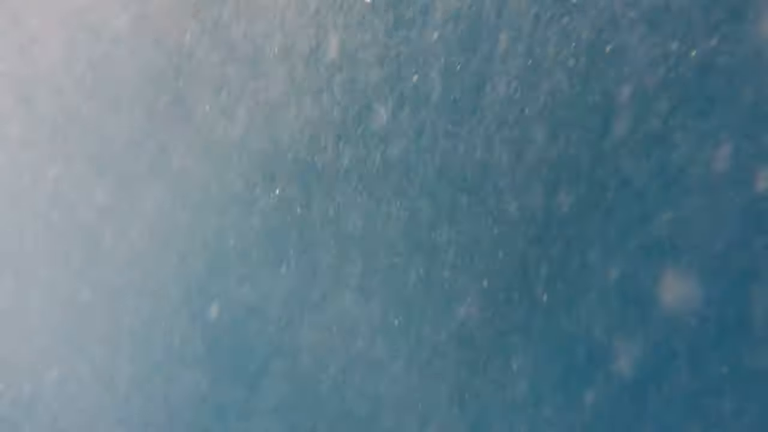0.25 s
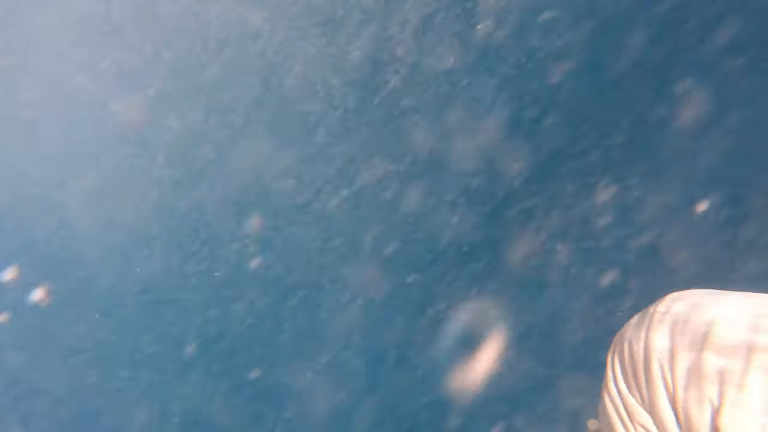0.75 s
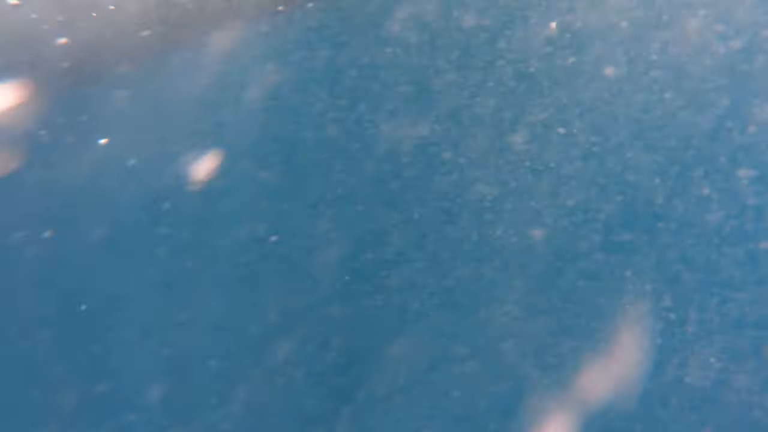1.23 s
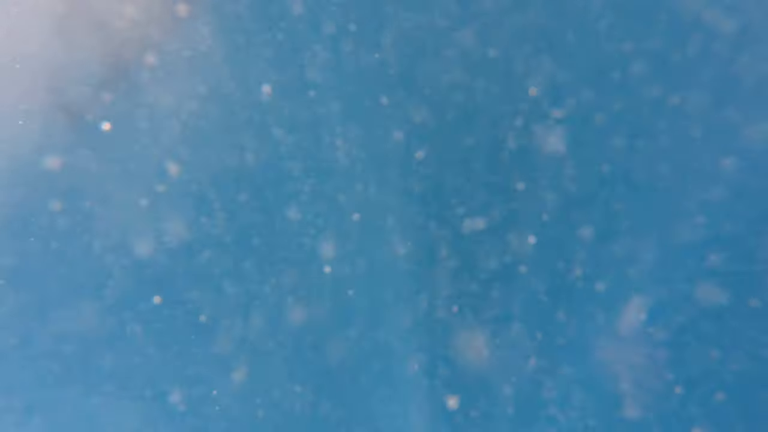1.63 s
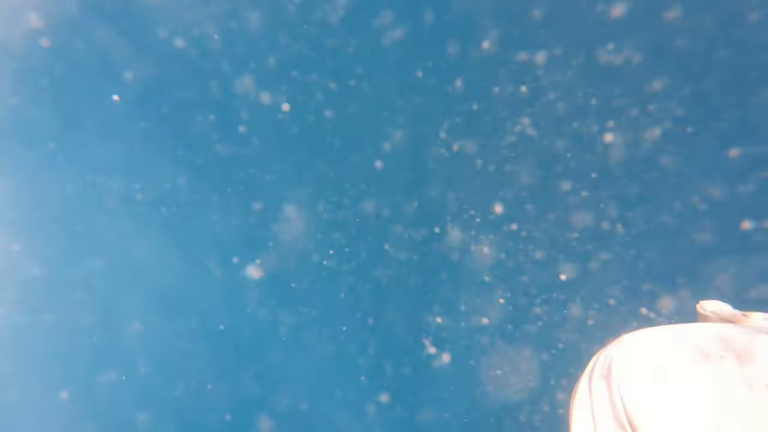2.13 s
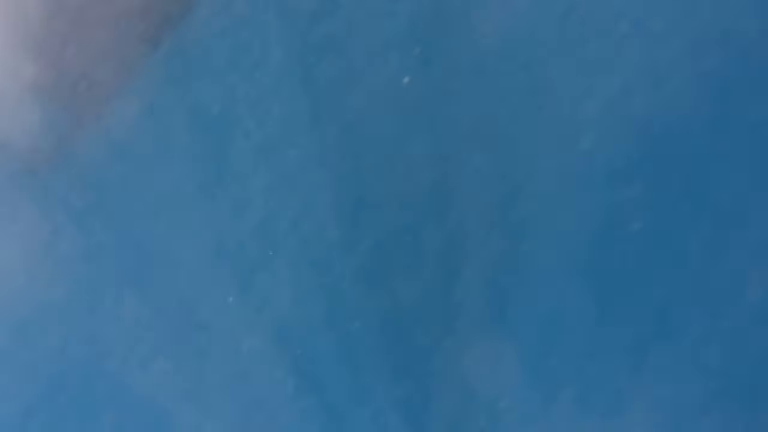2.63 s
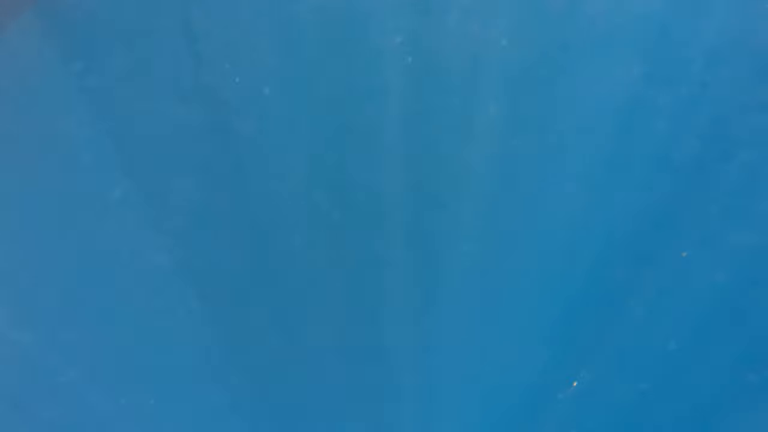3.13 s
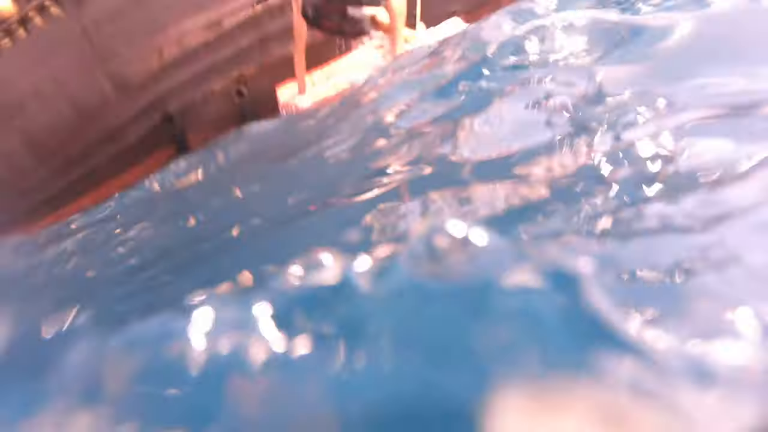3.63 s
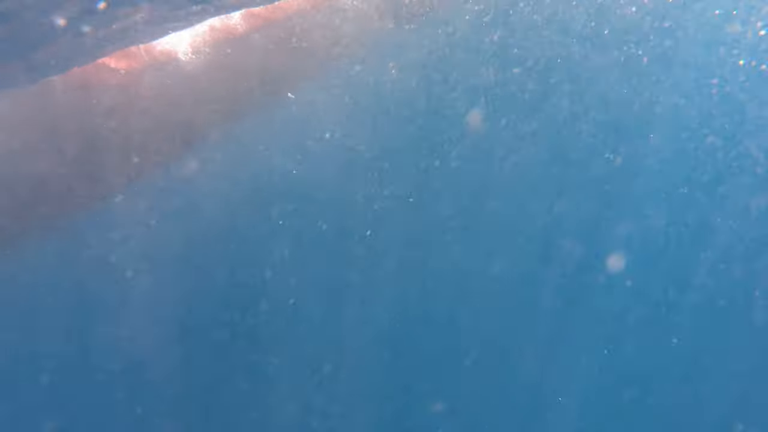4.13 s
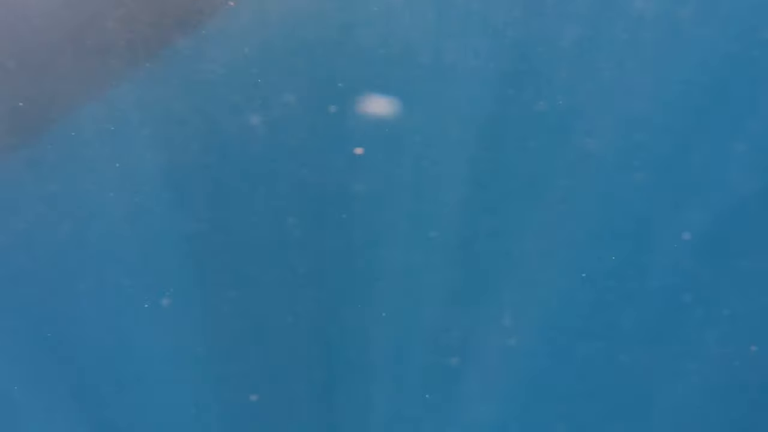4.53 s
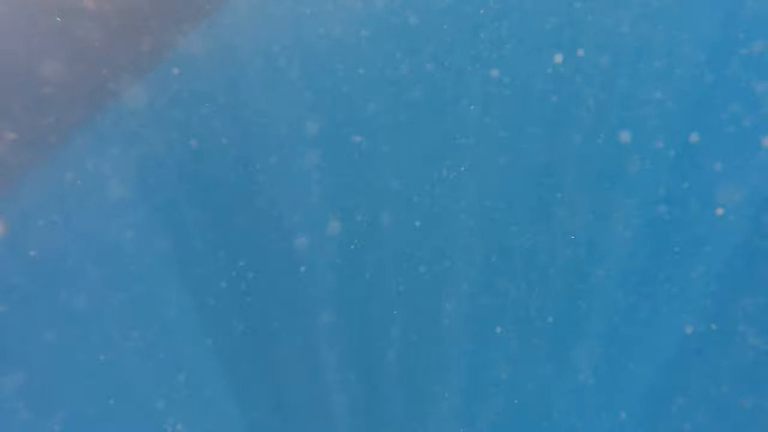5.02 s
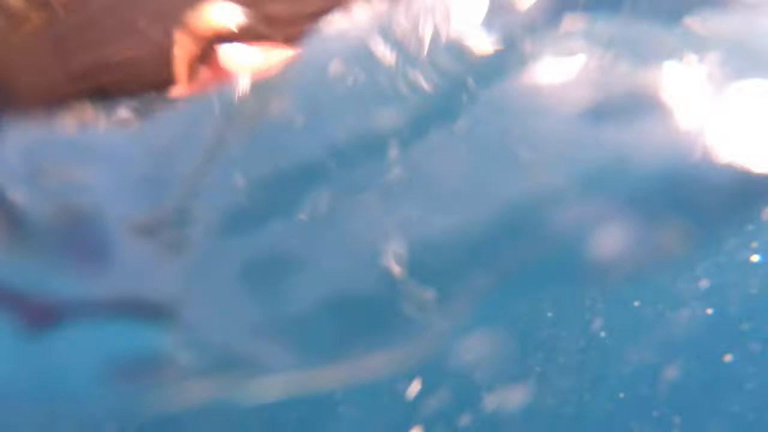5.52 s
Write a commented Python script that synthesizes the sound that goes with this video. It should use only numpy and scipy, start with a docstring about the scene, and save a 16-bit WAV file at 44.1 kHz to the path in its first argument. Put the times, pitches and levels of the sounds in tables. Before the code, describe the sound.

Heard from just below the surface of the sea, water churns gently around a microphone in a waterproof case. Close bubbles blip, click and crackle at uneven intervals, mixed with a few lower, wavering gurgles. Faint froth swells with each cluster and settles between them. Muffled bumps of water hit the case, the strongest near the middle and again about three quarters through.

```python
"""Air bubbles pinch off and ring for a few cycles near a sealed camera housing under the sea surface.
Tiny bubbles tick, air pockets gurgle as they change shape, and water shoves the case.
Behind them the water sloshes, froths and fizzes, swelling around the near bubbles.
The housing rings briefly; phase and level offsets between the channels give stereo width."""
import sys
import numpy as np
from scipy import signal
from scipy.fft import rfft, irfft, next_fast_len
from scipy.io import wavfile
from scipy.ndimage import uniform_filter1d, map_coordinates

SR = 44100
rng = np.random.default_rng(int(sys.argv[2]) if len(sys.argv) > 2 else 0)


def inscribe(sig):
    """Save sig as 16-bit PCM at rate SR to the path in sys.argv[1].

    A 1-D sig is mono; a 2-D sig holds one channel per row.
    Samples are clipped to [-1, 1] before scaling.
    """
    pcm = np.round(np.clip(np.atleast_2d(sig).T, -1, 1) * 32767)
    wavfile.write(sys.argv[1], SR, pcm.astype(np.int16))


N = 254456


def amp(db):
    """dB to gain."""
    return 10 ** (np.asarray(db) / 20)


def unit_rms(x):
    """x at rms 1."""
    return x / np.sqrt(np.mean(x ** 2) + 1e-20)


def curve_at(points, hz):
    """Interpolate (freq_hz, value) points on a log frequency axis."""
    freq_hz, values = np.transpose(points)
    return np.interp(np.log(hz + 1), np.log(freq_hz + 1), values)


def wobble(rate_hz):
    """Smooth random curve, rate_hz knots a second."""
    knots = rng.standard_normal(int(N * rate_hz / SR) + 4)
    return map_coordinates(knots, [np.arange(N) * rate_hz / SR])


def filtered(x, response):
    """Filter x by the gain response(hz)."""
    size = next_fast_len(N + SR // 4)
    return irfft(rfft(x, size) * response(np.fft.rfftfreq(size, 1 / SR)), size)[..., :N]


def noise(spectrum):
    """Stereo noise shaped by (freq_hz, density_db) points."""
    return filtered(rng.standard_normal((2, N)), lambda hz: amp(curve_at(spectrum, hz)))


# Stereo width, the left channel's phase lead over the right, by pitch: pitch_hz, lead_rad
STEREO_LEAD = [(330, -.4), (470, 2.5), (800, -2.5), (1200, -4), (1700, -5.5), (2600, -11.5), (3300, -5),
               (4000, -4), (5000, -3.5), (7000, -4), (8700, -1)]
def rings(start_s, db, hz, t60_s, pan_db, swell, glide, scatter, samples):
    """Damped stereo sines; swell is the rise time over t60, glide the relative pitch climb per t60."""
    t = np.arange(samples) / SR
    start_s, db, hz, t60_s, pan_db = (
        np.asarray(v, float)[:, None] for v in (start_s, db, hz, t60_s, pan_db))
    age = t / t60_s
    rise_s = swell * t60_s + 0.00006  # the case limits the fastest rise
    end_fade = np.minimum(1, 4 - 4 * t / t[-1])
    envelope = amp(-60 * age) * (1 - np.exp(-t / rise_s)) ** 2 * end_fade
    envelope *= amp(db) / envelope.max(axis=1, keepdims=True)
    phase = 2 * np.pi * hz * t * (1 + glide * age / 2)
    scatter_rad = scatter * np.clip(hz / 900, 0, 1) * rng.standard_normal(hz.shape)
    lead_rad = curve_at(STEREO_LEAD, hz) + scatter_rad
    index = (np.round(start_s * SR).astype(int) + np.arange(samples)).ravel()
    pair = [amp(side * pan_db / 2) * envelope * np.sin(phase + side * lead_rad / 2) for side in (1, -1)]
    return np.array([np.bincount(index, channel.ravel(), N + samples)[:N] for channel in pair])


# Hiss spectrum: freq_hz, density_db
HISS_SPECTRUM = [(2000, -30), (3300, 0), (6000, -7), (10500, -8)]
def hiss():
    """Bubbles too fine to tell apart."""
    return unit_rms(amp(5 * wobble(120)) * noise(HISS_SPECTRUM))


# Wash spectrum: freq_hz, density_db
WASH_SPECTRUM = [(200, -39.5), (450, -6), (900, 7.5), (1700, -11), (2600, 1), (3500, -17), (4500, -25),
                 (7000, -39), (16000, -100)]
def wash():
    """Muffled, patchy water noise."""
    return unit_rms(amp(3.5 * wobble(30)) * noise(WASH_SPECTRUM))


# Slosh spectrum: freq_hz, density_db
SLOSH_SPECTRUM = [(15, -24), (35, 0), (110, -3), (200, -8), (320, -13), (600, -37), (2500, -120)]
def slosh():
    """Low, lumpy water motion, nearly mono."""
    mid, side = noise(SLOSH_SPECTRUM)
    return unit_rms(amp(4.5 * wobble(25)) * (mid + 0.11 * np.array([side, -side])))


def swarm(count, centre_hz, spread, cycles, tail_db, samples):
    """Random bubbles in clumps: log-normal pitch, few loud and many faint."""
    pitch_z, life_z, pan_z = rng.standard_normal((count, 3)).T
    hz = np.clip(centre_hz * np.exp(spread * pitch_z), 480 + 60 * life_z, 14000)
    db = tail_db * np.minimum(rng.exponential(size=count), 2.7)
    db -= 2 * np.log2(hz / centre_hz)  # smaller bubbles are weaker
    cumulative_rate = np.cumsum(amp(7 * wobble(45)))
    start_s = np.searchsorted(cumulative_rate, rng.random(count) * cumulative_rate[-1]) / SR
    t60_s = cycles * np.exp(0.61 * life_z) / hz
    return unit_rms(rings(start_s, db, hz, t60_s, 4 * pan_z,
                          swell=0.068, glide=0.06, scatter=0.37, samples=samples))


# Churn around the case, before stirring: time_s, slosh_db, froth_db, sparkle_db
CHURN_LEVELS = [(0.0, -36, -32.5, -62), (0.3, -52, -42.5, -65), (0.46, -51.5, -51.5, -73),
                (0.72, -51, -50, -72.5), (1.27, -40, -37.5, -61.5), (1.4, -48.5, -38, -68),
                (1.53, -48, -51.5, -70.5), (2.54, -48.5, -45.5, -70), (2.79, -37.5, -35, -65),
                (3.18, -48.5, -43, -68.5), (3.47, -46.5, -49, -68.5), (3.74, -51, -49.5, -68),
                (3.92, -42, -42.5, -62), (4.39, -48.5, -49, -68), (4.74, -49, -42, -66.5),
                (5.26, -57, -45.5, -69), (5.58, -44.5, -41.5, -65), (5.77, -39.5, -41.5, -65)]
def water():
    """Churning water: slosh, a froth of small bubbles and a sparkle of finer ones."""
    time_s, *levels_db = np.transpose(CHURN_LEVELS)
    slosh_db, froth_db, sparkle_db = (np.interp(np.arange(N) / SR, time_s, db) for db in levels_db)
    low, muffled = slosh(), wash()
    small = swarm(count=3200, centre_hz=1257.3, spread=0.5868, cycles=25, tail_db=3, samples=800)
    crackle = swarm(count=1000, centre_hz=3220, spread=0.42, cycles=5.3, tail_db=3.5, samples=150)
    fizz = swarm(count=14000, centre_hz=5400, spread=0.33, cycles=8.3, tail_db=-0.5, samples=90)
    froth = amp(-8) * muffled + amp(0.3) * small
    sparkle = amp(3) * crackle + amp(-1) * fizz + amp(-8) * hiss()
    return amp(slosh_db) * low + amp(froth_db) * froth + amp(sparkle_db) * sparkle


def stirring(near, window_s=0.07, knee_db=-43, calm_db=-4, growth=0.34):
    """Gain of the water: near bubbles stir it up, and it calms between them."""
    window = round(window_s * SR)
    power = abs(uniform_filter1d(np.mean(near ** 2, axis=0), window, origin=window // 4))
    return amp(calm_db) * (1 + power / amp(knee_db) ** 2) ** (growth / 2)


# Housing decay: freq_hz, t60_s
HOUSING_DECAY = [(300, 0.033), (1700, 0.066), (4000, 0.021), (10000, 0.0029)]
def housing(x):
    """The case rings on after x, with a different tail in each channel."""
    hz, t, spectra = signal.stft(rng.standard_normal((2, SR // 8)), SR, nperseg=128)
    decay = amp(-60 * t / curve_at(HOUSING_DECAY, hz)[:, None])
    tail = signal.istft(spectra * decay, SR, nperseg=128)[1]
    tail /= np.linalg.norm(tail, axis=1, keepdims=True)
    return signal.fftconvolve(x, tail, axes=1)[:, :N]


# Water shoves: dip_s, level_db, swing_hz
WATER_SHOVES = [(0.106, -23, 202), (1.193, -24, 106), (1.361, -18, 44.2), (1.465, -11.5, 144),
                (1.528, -10.5, 102.7), (1.748, -21, 82.4), (1.798, -20.5, 74), (1.956, -24, 49.7),
                (2.043, -15.5, 192), (2.649, -13.5, 133), (2.705, -15.5, 58.4), (2.745, -12, 99),
                (2.844, -5, 158), (2.928, -21.5, 114), (3.364, -21.5, 71.6), (3.845, -16.5, 103),
                (4.026, -15, 90.5), (4.322, -18, 99), (4.346, -17.5, 122.4), (4.366, -3.5, 119),
                (4.463, -17, 94.5), (5.398, -24.5, 46.1), (5.558, -20.5, 57), (5.761, -13, 84)]
def shoves(t60_cycles=3.17):
    """Water pushes the case: a small rise, a rounded pressure dip, a slow swing back."""
    out, t = np.zeros(N + 4000), np.arange(-1000, 3000) / SR
    taper = np.hanning(4000) ** 0.5
    for dip_s, db, hz in WATER_SHOVES:
        cycles = hz * t + 0.25
        rise = -0.27 * 8 * cycles * np.exp(np.minimum(8 * cycles, 0))
        swing = -np.sin(2 * np.pi * cycles) * amp(-60 * cycles / t60_cycles)
        start = round(dip_s * SR) - 1000
        out[start:start + 4000] += amp(db) * np.where(cycles > 0, swing, rise) * taper
    return out[:N] * amp([[-0.3], [0.3]])


# Air pockets, one track each: time_s, pitch_hz, level_db
POCKET_TRACKS = [
    [(1.018, 555, -34), (1.026, 553, -29.5), (1.044, 549, -33), (1.055, 509, -56)],
    [(1.09, 620, -44), (1.096, 620, -39), (1.124, 630, -46), (1.132, 623, -48), (1.14, 573, -45)],
    [(1.143, 556.4, -28), (1.171, 554, -27.5), (1.183, 585, -41), (1.237, 657, -35), (1.29, 706, -56)],
    [(2.3, 540, -40), (2.306, 528, -35), (2.328, 532, -42.5), (2.35, 593, -46), (2.36, 578, -33)],
    [(2.647, 475, -19.5), (2.673, 478, -28.5), (2.691, 436, -32), (2.725, 430, -45), (2.74, 398, -31)],
    [(2.745, 406, -36), (2.801, 497, -17.5), (2.825, 494, -23.5), (2.875, 560, -35), (2.9, 755, -51)],
    [(2.95, 515.7, -54), (2.988, 443.4, -30), (3.024, 451, -40.5), (3.06, 620, -22.5), (3.09, 644, -31.5)],
    [(3.225, 554, -31), (3.235, 563, -37.5), (3.275, 544, -34.5), (3.325, 552, -30.5), (3.34, 586, -22)],
    [(4.36, 561, -14), (4.368, 595, -14.5), (4.38, 746, -29), (4.39, 700, -69)],
    [(4.885, 319, -63), (4.893, 316, -44.5), (4.899, 329.4, -41), (4.915, 453, -47), (4.925, 469, -61.5)],
]
def pockets(attack_s=0.00028, release_s=0.0025):
    """Air pockets ring on as they change shape; the flow shakes their pitch and level."""
    t, out = np.arange(N) / SR, np.zeros((2, N))
    waver, kicks_db = 1 + 0.04057 * wobble(90), 2.5 * wobble(60)
    for track in POCKET_TRACKS:
        time_s, hz, db = np.transpose(track)
        gate = np.clip(np.minimum((t - time_s[0]) / attack_s, (time_s[-1] - t) / release_s), 0, 1)
        envelope = np.sqrt(2) * gate * amp(np.interp(t, time_s, db) + kicks_db)
        phase = 2 * np.pi * np.cumsum(np.interp(t, time_s, hz) * waver) / SR
        lead_rad = curve_at(STEREO_LEAD, np.mean(hz)) + 0.15 * rng.standard_normal()
        out += envelope * np.sin(phase + np.array([[lead_rad], [-lead_rad]]) / 2)
    return out


# Ticks of the smallest bubbles: start_s, level_db, pitch_hz
BUBBLE_TICKS = [(0.047, -24.5, 9370), (0.0817, -23.5, 6900), (0.1033, -25.5, 5540), (0.159, -32.5, 5870),
                (0.185, -24, 8800), (0.2106, -34, 5700), (0.2438, -45, 5800), (0.256, -27, 9300),
                (0.2772, -24, 8240), (0.307, -42.5, 5600), (0.3861, -25.5, 6100), (0.4449, -40, 7060),
                (0.61, -44.5, 6850), (0.765, -27.5, 8580), (0.849, -42, 6580), (0.8597, -39.5, 5600),
                (0.9273, -35, 7650), (1.0897, -42, 5700), (1.1418, -22, 5600), (1.208, -24.5, 8900),
                (1.287, -35, 8990), (1.3303, -25, 6910), (1.3578, -14.5, 7380), (1.4318, -28, 5630),
                (1.4571, -46, 5430), (1.6454, -33, 5550), (1.747, -33.5, 8700), (1.7751, -11, 5550),
                (1.7894, -26, 7360), (1.809, -32.5, 9390), (1.8471, -22.5, 6530), (1.9036, -37, 6180),
                (2.0355, -33, 5650), (2.1598, -37, 6130), (2.4958, -44, 5350), (2.6137, -34, 5950),
                (2.6329, -40, 8960), (2.6484, -17, 6580), (2.6648, -26, 8160), (2.681, -23.5, 6110),
                (2.706, -21, 7700), (2.7404, -16, 5450), (2.7666, -45, 9360), (2.7862, -18, 10300),
                (2.7924, -36, 6360), (2.8138, -31.5, 7600), (2.9065, -24.5, 7600), (2.9616, -31.5, 9260),
                (2.9859, -36.5, 8450), (3.0056, -37, 6180), (3.0712, -26.5, 5760), (3.2817, -43.5, 6100),
                (3.3747, -42, 5880), (3.4216, -21, 9570), (3.7861, -27, 5500), (3.796, -15, 5780),
                (3.8487, -31, 5940), (3.8906, -44, 5800), (3.947, -32.5, 5500), (3.9923, -20, 9000),
                (4.0004, -22.5, 8900), (4.0109, -38, 6990), (4.048, -23.5, 9500), (4.0925, -27.5, 7360),
                (4.1985, -31, 5480), (4.3046, -28, 5540), (4.3209, -10.5, 10700), (4.3593, -32, 5470),
                (4.45, -42, 5330), (4.4902, -23.5, 5550), (4.6057, -31, 9660), (4.6743, -36, 5500),
                (4.684, -28.5, 9220), (4.7205, -22, 8250), (4.7457, -32, 8700), (4.784, -41, 8270),
                (4.809, -23, 10500), (4.8322, -15, 5170), (4.896, -26.5, 6700), (4.9825, -33.5, 6500),
                (5.162, -40.5, 5460), (5.3653, -25, 6700), (5.443, -22, 5830), (5.4744, -34, 8300),
                (5.495, -16, 5760), (5.518, -28, 7520), (5.627, -40, 5800), (5.6386, -32, 5600),
                (5.746, -28.5, 5460)]
def ticks():
    """Four tiny bubbles over one broad snap per tick, mostly louder on the right."""
    start_s, db, hz = np.repeat(np.transpose(BUBBLE_TICKS), 4, axis=1)
    pitch_z, time_z, level_z, pan_z = rng.standard_normal((len(hz), 4)).T
    pan_db = 4 * pan_z - 3
    tiny_hz = np.clip(hz * np.exp(0.29 * pitch_z), 4500, 15000)
    tiny_s = start_s - 0.0004 + 0.00052 * time_z
    tiny = rings(tiny_s, db - 7.5 + 2.1 * level_z, tiny_hz, 20 / tiny_hz, pan_db,
                 swell=0.07, glide=0, scatter=0.15, samples=400)
    snap = rings(start_s[::4], db[::4] - 4, hz[::4] / 2, 5 / hz[::4], pan_db[::4],
                 swell=0.052, glide=0, scatter=0.28, samples=100)
    return tiny + snap


def spray():
    """Fine fizz scattered for some milliseconds around each tick."""
    start_s, db, hz = np.repeat(np.transpose(BUBBLE_TICKS), 16, axis=1)
    pitch_z, time_z, level_z, pan_z = rng.standard_normal((len(hz), 4)).T
    fine_hz = np.clip(hz * np.exp(0.52 * pitch_z), 2500, 15000)
    fine_s = np.clip(start_s + 0.004 + 0.013 * time_z, 0, N / SR)
    fine_db = 0.65 * db - 37.5 + 5 * level_z  # a louder tick throws only somewhat more
    return rings(fine_s, fine_db, fine_hz, 10 / fine_hz, 4 * pan_z - 3,
                 swell=0.065, glide=0, scatter=0.45, samples=120)


def shed_bubbles(parent_s, parent_db, parent_hz):
    """Each pinch-off sheds three smaller bubbles within milliseconds."""
    start_s, db, hz = np.repeat([parent_s, parent_db, parent_hz], 3, axis=1)
    pitch_z, time_z, level_z, pan_z = rng.standard_normal((len(hz), 4)).T
    shed_hz = np.clip(hz * 1.412 * np.exp(0.439 * pitch_z), hz, 9000)
    shed_s = start_s + 0.0029 * abs(time_z)
    return rings(shed_s, db - 14 + 4 * level_z, shed_hz, 14.29 / shed_hz, 4 * pan_z,
                 swell=0.089, glide=0.041, scatter=0.37, samples=500)


# Near bubbles: start_s, level_db, pitch_hz, t60_cycles, pan_left_db
NEAR_BUBBLES = [(0.0472, -17.5, 3070, 4.5, -5), (0.0781, -26, 847, 73, 3.5), (0.082, -24, 1710, 30, -0.5),
                (0.1566, -13, 2048, 22, -5.5), (0.2006, -15, 1466, 27, 3), (0.2087, -18, 990, 19, 8),
                (0.2117, -18, 1570, 29.5, -1), (0.245, -15, 3270, 16, 5), (0.2504, -14, 1690, 13, 3),
                (0.2785, -15, 1680, 43, -2.5), (0.2792, -20.5, 1100, 42, -3), (0.318, -24.5, 1790, 53, 14),
                (0.3353, -12, 1759, 32, 4), (0.381, -19.5, 1620, 81.5, 4), (0.432, -33.5, 315, 33.5, 2),
                (0.4453, -14, 1580, 11.5, 16), (0.461, -21.5, 1668, 45, -1), (0.4836, -29, 1710, 31.5, 18),
                (0.7665, -8.5, 1818, 11.5, -0.5), (0.8312, -18.5, 1703, 47, -0.5),
                (0.832, -19, 3360, 11.5, 11.5), (0.851, -22, 2210, 40, -11.5), (0.8608, -20, 1770, 36.5, 0),
                (0.8616, -21, 3280, 29, 9), (0.8649, -27, 2400, 41, -10.5), (0.923, -35, 685, 46, 3),
                (1.0778, -21, 1698, 78, 2.5), (1.09, -25, 4900, 40, -17.5), (1.091, -12.5, 1918, 26, 2),
                (1.115, -29, 1880, 43, -3.5), (1.1304, -23.5, 1960, 29.5, 0), (1.1414, -13.5, 1915, 34, -3),
                (1.175, -22, 2500, 7, -1), (1.198, -32, 5000, 20, 2), (1.2217, -17.5, 2550, 42, -2),
                (1.2446, -25.5, 891, 51, 8), (1.2766, -24.5, 1400, 75, 16.5), (1.328, -15.5, 791, 18, 6),
                (1.3458, -20.5, 755, 31, 3.5), (1.3594, -14.5, 3300, 7.5, -8), (1.39, -27.5, 2170, 20, -2),
                (1.416, -19.5, 940, 50, -3.5), (1.432, -27, 1410, 26, 1), (1.4593, -8.5, 565, 10.5, 11),
                (1.4603, -11.5, 915, 13.5, -8.5), (1.5007, -19, 2670, 20, 14), (1.511, -18, 818, 37, 0),
                (1.55, -18.5, 1810, 11, -2.5), (1.742, -29, 1420, 37, -11.5),
                (1.7544, -27.5, 1710, 43, -8.5), (1.7741, -21.5, 5070, 0.5, 1.5),
                (1.775, -15, 1840, 6, -2.5), (1.7882, -13, 914, 21, -7), (1.828, -21, 1890, 18.5, 1),
                (1.847, -9.5, 1770, 18, 2), (1.8463, -20, 2956, 25, 16), (1.9029, -16.5, 1390, 4, 12.5),
                (1.9032, -12, 2900, 23, 11.5), (2.026, -15, 1310, 14.5, -5.5), (2.037, -30, 691, 45, 0),
                (2.05, -35, 3080, 20, 1), (2.055, -36, 1850, 40, 0), (2.063, -33, 1250, 31, -1),
                (2.101, -33.5, 650, 20, -1), (2.1326, -34, 1546, 65, 0), (2.153, -32, 1106, 67, -3),
                (2.212, -35.5, 2210, 42, -8), (2.282, -35.5, 1740, 40, -1.5), (2.358, -31.5, 3300, 14, -1),
                (2.359, -21, 1520, 12.5, -1), (2.3752, -32, 1720, 63, -2), (2.437, -39, 1790, 50, 0),
                (2.491, -25, 3270, 19, 0), (2.4971, -24.5, 823, 11, -5.5), (2.4975, -16.5, 2660, 15.5, 8.5),
                (2.499, -18, 3620, 15, 5), (2.56, -26.5, 1744, 48, -6), (2.6184, -8.5, 837, 11.5, -3.5),
                (2.6495, -17, 1812, 37, 4.5), (2.691, -19.5, 1326, 43, -1), (2.7065, -8, 3100, 23, 3),
                (2.7381, -15, 2970, 65, -2.5), (2.7461, -11, 896, 24, 1.5), (2.767, -19.5, 777, 27, 1.5),
                (2.7675, -24, 3640, 12.5, 2), (2.786, -14.5, 964.4, 37, 9.5), (2.839, -8.5, 942, 27, -4),
                (2.8395, -8, 680, 5.5, 1), (2.901, -30, 1600, 31, 2), (2.926, -28.5, 1600, 30, 1),
                (2.944, -29.5, 3200, 32, -1), (2.958, -23, 1104, 40, 3), (2.9589, -23, 1680, 29, 12),
                (2.9865, -21.5, 2600, 32.5, 2), (2.994, -22, 1840, 44, 2), (3.0051, -18, 827, 21.5, -1),
                (3.0708, -24, 3300, 34, 8), (3.088, -17, 1760, 44.5, -1), (3.0881, -14, 1103, 15, 12),
                (3.119, -31.5, 698, 24, -1), (3.203, -26, 900, 7.5, 1), (3.2695, -23, 2000, 51, -9.5),
                (3.281, -28.5, 2980, 23, 1), (3.2884, -23, 1984, 50, -2), (3.327, -13.5, 800, 42.5, -6.5),
                (3.346, -19, 1118, 59, 2.5), (3.357, -25.5, 2800, 71.5, 13), (3.362, -21, 812, 39, -6),
                (3.3756, -9.5, 2135, 37.5, 5.5), (3.376, -23, 4400, 22, -1), (3.3777, -10, 1066, 17.5, 0),
                (3.406, -15.5, 834, 13.5, -9.5), (3.4201, -20, 1010, 37, -2.5),
                (3.423, -18, 1620, 6.5, 4.5), (3.7036, -15, 1050, 38, 1.5), (3.704, -17.5, 2020, 13, -3),
                (3.706, -21.5, 3100, 35, -6), (3.7942, -22, 4960, 13, 7), (3.796, -20, 1570, 14, 2),
                (3.7947, -18.5, 3180, 4.5, -9), (3.8124, -20.0, 2070, 42, 3),
                (3.8277, -12.5, 2080, 28, -5.5), (3.8274, -11.5, 1170, 4.5, 7.5),
                (3.8328, -21.5, 3260, 46, -2), (3.891, -19.5, 4280, 32, -10.5),
                (3.9042, -15.0, 1434, 26.5, 0), (3.9042, -22, 740, 16, -3), (3.9173, -11.5, 2850, 38, 12.5),
                (3.928, -22.5, 1790, 29, -1), (3.9859, -12, 1168, 41, -5.5), (4.0068, -9, 1548, 17.5, -5.5),
                (4.0324, -18.5, 1060, 12, -2.5), (4.1267, -31.5, 1530, 37, 10.5),
                (4.2163, -18.5, 760, 9.5, 0.5), (4.2174, -14, 1950, 25, 1.5), (4.232, -26, 3450, 5.5, -0.5),
                (4.241, -30, 2980, 6.5, 1), (4.262, -22.5, 1280, 26, 2), (4.302, -25.5, 2680, 39.5, 0),
                (4.305, -18, 4580, 23, -13.5), (4.3198, -11.5, 1990, 5, 1), (4.319, -10, 930, 12.5, 4.5),
                (4.325, -23, 3510, 20.5, -0.5), (4.34, -15, 504, 3.5, -0.5), (4.34, -8.5, 918, 25, 3.5),
                (4.361, -14, 299, 4, 0), (4.3737, -15.5, 1450, 24, 2), (4.408, -35, 4130, 38, -10),
                (4.4516, -13.0, 5160, 51, -6), (4.4565, -18, 3400, 3, -20.5),
                (4.4715, -10.5, 2356, 30, 6.5), (4.4916, -25, 3150, 36, -10), (4.5767, -16.5, 1976, 40, -4),
                (4.5882, -16, 772, 37, 12), (4.618, -17.5, 2400, 19, -3), (4.6223, -15, 1405, 23, -0.5),
                (4.6236, -20.5, 850, 16, 7), (4.658, -33, 2880, 30.5, -2), (4.6727, -14, 2570, 16, 1),
                (4.7186, -20, 710, 14.5, 0), (4.7446, -19.5, 808, 22, 1), (4.7598, -26, 840, 26.5, 4),
                (4.8071, -19, 3260, 33, 1), (4.83, -15.5, 837, 25.5, 1.5), (4.8844, -26, 880, 31, -8.5),
                (4.9344, -25, 1720, 25.5, -1), (4.9637, -33.5, 1188, 81, 6), (5.1956, -34.5, 942, 72, -5.5),
                (5.232, -33.5, 1054, 76, -1), (5.349, -18.5, 714, 32, 3.5), (5.3617, -19, 2715, 11.5, 7.5),
                (5.362, -12, 4650, 18, -4), (5.3654, -14.5, 1570, 39.5, -2), (5.394, -16.5, 1410, 27.5, 9),
                (5.4643, -20, 1400, 30, -3), (5.4933, -17, 3160, 18.5, -2), (5.4999, -31, 623, 69, 1.5),
                (5.5192, -16.5, 4650, 50.5, -4.5), (5.5632, -17, 1200, 61.5, -8),
                (5.5725, -20.5, 700, 38.5, 4), (5.639, -15.5, 1680, 49.5, -4),
                (5.639, -13.0, 3270, 9.5, -9.5), (5.7622, -24.5, 1666, 35, -1.5)]
def bubbles():
    """A bubble pinches off and rings; its neck snaps shut with a broad click and sheds smaller ones."""
    start_s, db, hz, t60_cycles, pan_db = np.transpose(NEAR_BUBBLES)
    t60_s = t60_cycles / hz
    flutter = amp(3.02 * np.array([wobble(220), wobble(220)]))  # neighbours and flow disturb the ring
    ring = rings(start_s, db, hz, t60_s, pan_db, swell=0.026, glide=0.026, scatter=0.7, samples=2600)
    snap = rings(start_s + 0.032 * t60_s, db - 9, hz * 1.106, 3.5 / hz, pan_db,
                 swell=0.02, glide=0, scatter=1.0, samples=400)
    return flutter * ring + snap + shed_bubbles(start_s, db, hz)


def scene():
    """Near bubbles with the ring of the case, over shoves and stirred water."""
    near = bubbles() + ticks() + spray() + pockets()
    return near + amp(-15) * housing(near) + shoves() + stirring(near) * water()


# Sealed microphone response: freq_hz, gain_db
MIC_RESPONSE = [(20, 4.5), (9800, 1.5), (11000, -11), (14000, -12), (16000, -27)]
def record(dry):
    """The loudest peaks overload the input; the sealed, band-limited microphones lose the top treble."""
    ceiling, top_hz = 0.97, 16500
    clipped = dry / (1 + abs(dry / ceiling) ** 8) ** (1 / 8)
    return filtered(clipped, lambda hz: amp(curve_at(MIC_RESPONSE, hz)) * (hz < top_hz))


dry = scene()
out = record(dry)
inscribe(out)
```